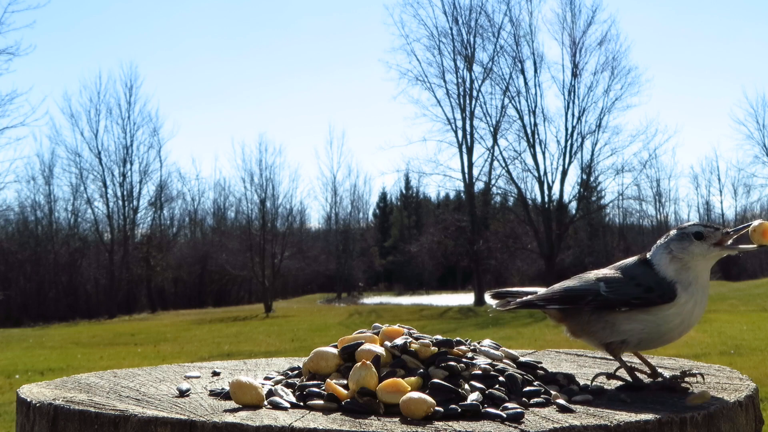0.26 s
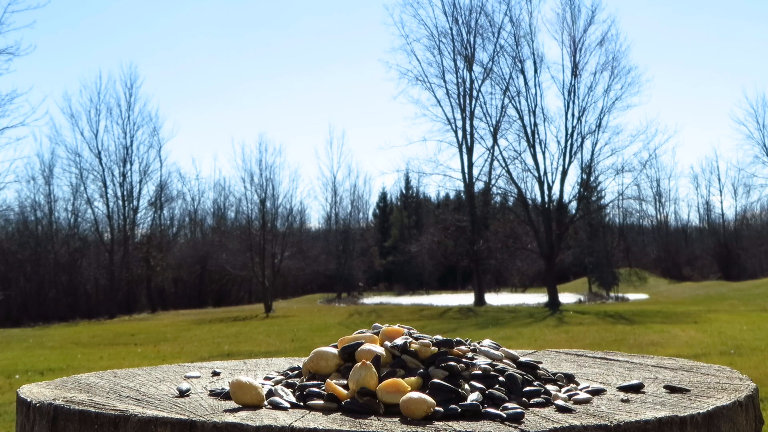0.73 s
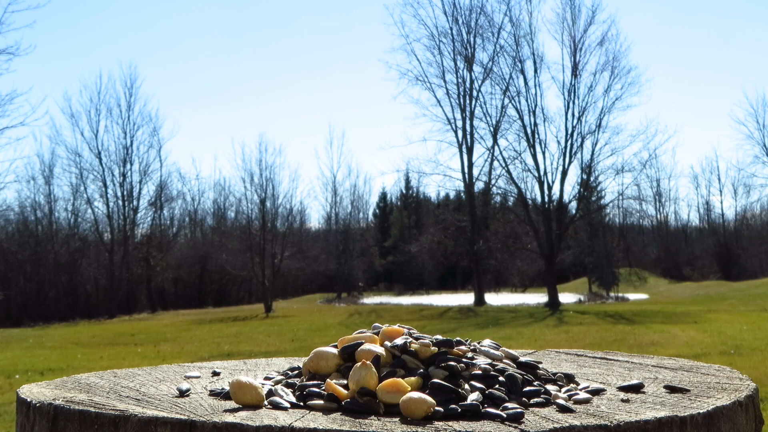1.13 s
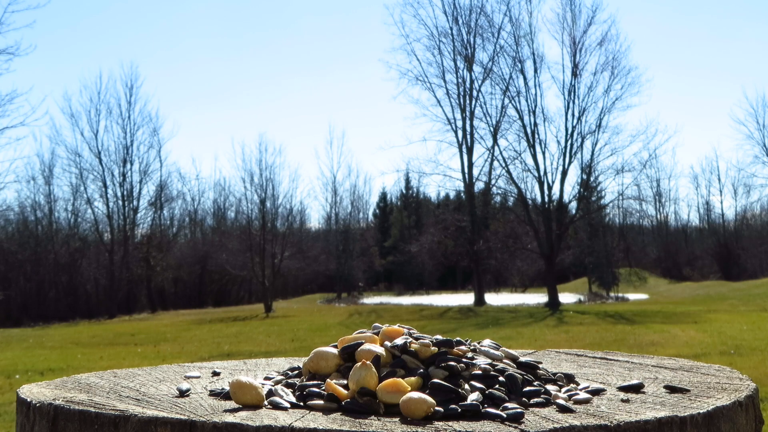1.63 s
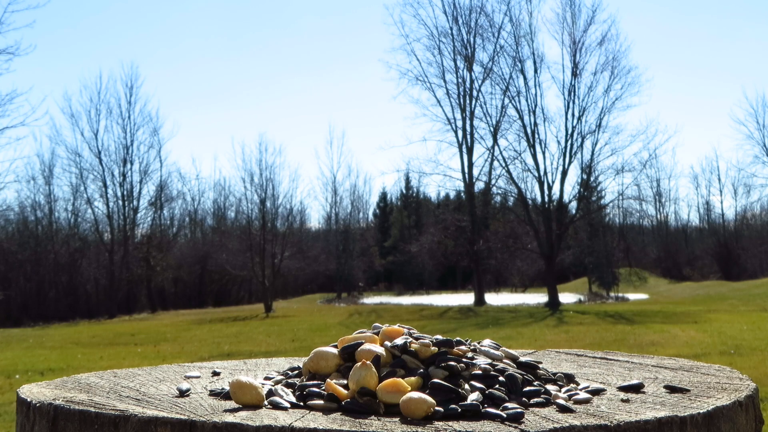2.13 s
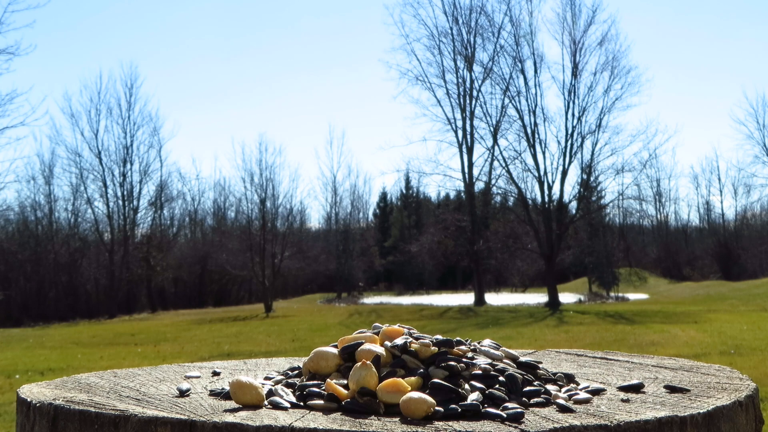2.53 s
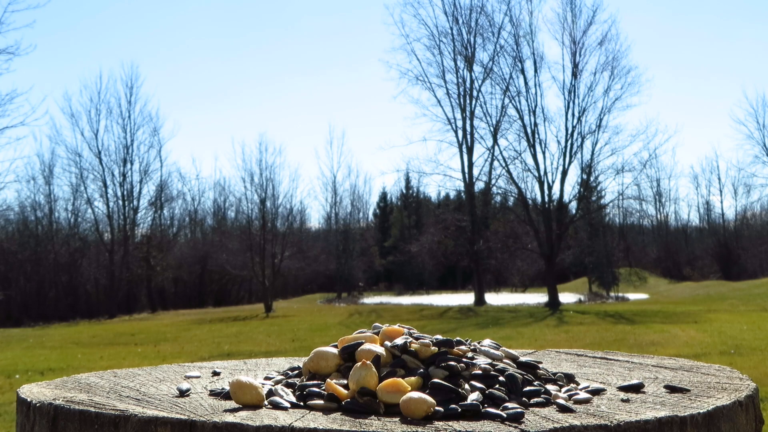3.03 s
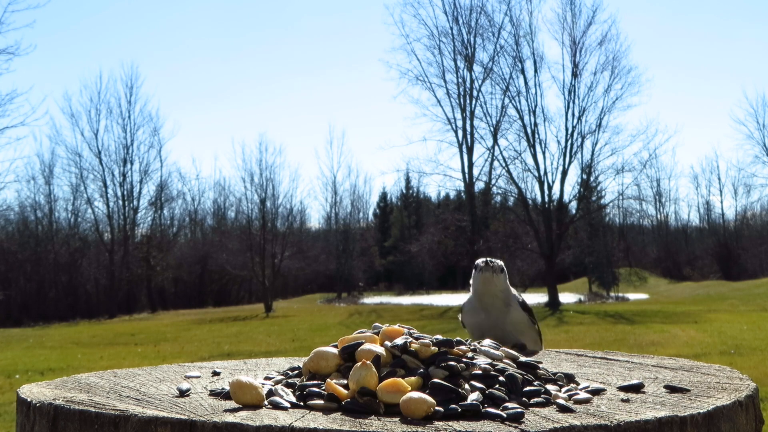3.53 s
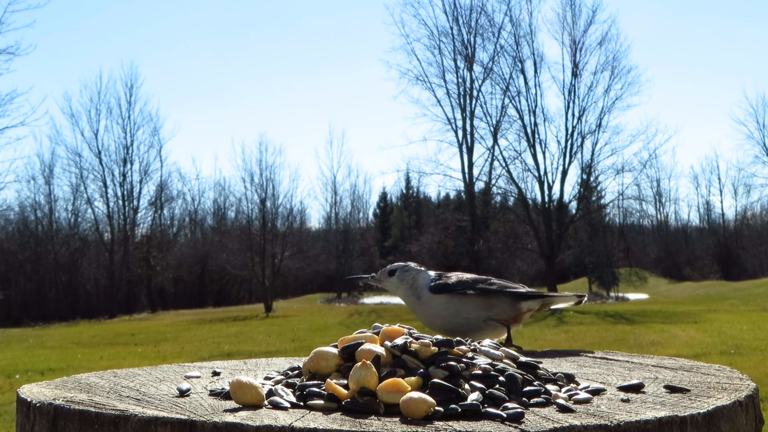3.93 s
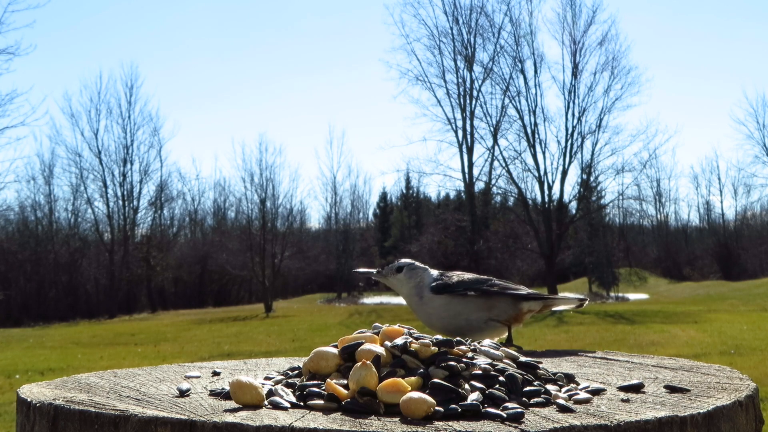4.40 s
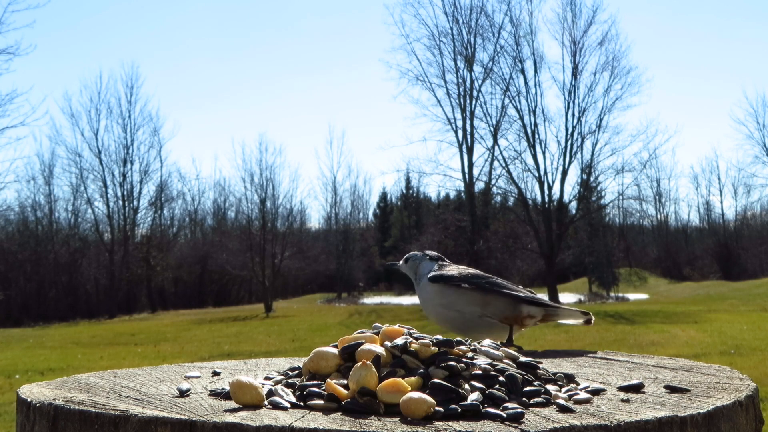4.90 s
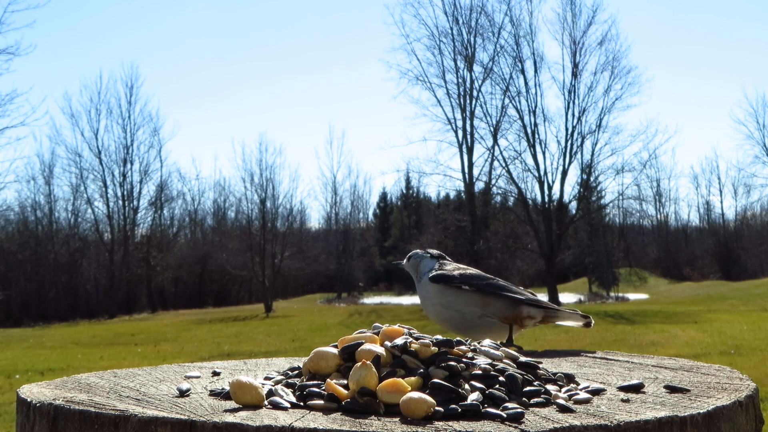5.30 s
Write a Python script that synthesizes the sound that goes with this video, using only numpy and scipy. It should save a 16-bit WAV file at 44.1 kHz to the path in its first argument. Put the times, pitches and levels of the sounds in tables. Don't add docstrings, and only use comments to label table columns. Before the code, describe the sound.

A quiet open field heard by a close stereo microphone: low distant traffic, light breeze, a fading engine drone and a barely audible high electronic whine run throughout. From 0.1 to 0.4 s, tiny dry ticks of claws and husks lean left on the wood. At about 0.6 s, amid low wind buffets, a sharp woody knock marks a push-off; from 0.75 to 0.95 s rapid feathery wingbeats, with claps and puffs, swing right and vanish. A faint nasal call comes at 1.1 s, a fainter one at 1.7 s, another brief one at 3.1 s. Soft wingbeats at 3.4-3.6 s bring a bird in to land, with a small engine rev far off and a tiny call. At 3.9 s a loud, very short nasal call, about 40 milliseconds, rings close with faint echo. A second, somewhat softer, follows at 5.3 s, with a low wind buffet near the end.

```python
import sys
import numpy as np
from scipy import signal
from scipy.fft import rfft, irfft, next_fast_len
from scipy.io import wavfile
from scipy.ndimage import uniform_filter1d

SR = 44100
rng = np.random.default_rng(int(sys.argv[2]) if len(sys.argv) > 2 else 0)


def master_out(mix):
    frames = np.transpose(np.atleast_2d(mix))
    ceiling = np.clip(frames, -1, 1)
    pcm = np.round(ceiling * 32767).astype(np.int16)
    wavfile.write(sys.argv[1], SR, pcm)


def voltage_ratio(level):
    return 10 ** (np.asarray(level, float) / 20)


N = 245195
TIME = np.arange(N) / SR

# start_s, swell_s, hold_s, fade_db_per_s, level_db
FLIGHTS = [
    (.735, .012, .12, 90, -55),
    (3.33, .13, .17, 150, -62.5),
]


def colour(x, points):
    hz, db = np.transpose(points)
    size = next_fast_len(x.shape[-1])
    f = np.maximum(np.arange(size // 2 + 1) * SR / size, 1)
    gain = voltage_ratio(np.interp(np.log(f), np.log(hz), db))
    return irfft(rfft(x, size) * gain, size)[..., :x.shape[-1]]


def unit(x):
    return x / np.sqrt(np.mean(x ** 2))


def ring(x, hz, t60):
    pole = np.exp(2j * np.pi * hz / SR - np.log(1000) / (t60 * SR))
    return signal.lfilter([1], [1, -pole], x).imag


def add(out, x, s, pan_db):
    i = int(s * SR)
    x = x[..., :N - i]
    out[:, i:i + x.shape[-1]] += x * voltage_ratio(np.array([[pan_db], [-pan_db]]) / 2)


def walk(rate):
    k = int(SR / rate)
    held = np.repeat(rng.standard_normal(N // k + 1), k)
    slewed = uniform_filter1d(uniform_filter1d(held, k), k)
    return unit(slewed[:N])


def bump(s, half):
    return np.exp(-((TIME - s) / half) ** 2)


def land():
    # frequency_hz, density_db_per_hz
    spectrum = [(22, -14), (49, -3), (130, -0.5), (250, -6.5), (320, -13), (600, -10), (1330, -8.5),
                (1550, -15), (4000, -21), (8000, -28.5), (11500, -39.5), (12600, -53.5), (13800, -43),
                (14500, -62)]
    # frequency_hz, side_minus_mid_db
    width = [(60, -8), (110, -9), (200, 2), (380, 7), (700, -0.5), (1290, -5), (2380, -5.5), (4400, -6.5),
             (8120, -4), (15000, -0.5)]
    # time_s, level_db
    breeze_points = [(0.0, -54.5), (0.36, -55), (0.71, -55), (1.02, -51), (1.33, -56.5), (2.32, -55),
                     (2.49, -57.5), (2.74, -58.5), (3.13, -53.5), (4.3, -54), (4.65, -55.5), (5.26, -56.5),
                     (5.56, -55)]
    follow = [
        (0.66, 0.38),
        (0.082, 1),
        (0.42, 0.53),
    ]
    breeze = np.interp(TIME, *np.transpose(breeze_points))
    traffic = -0.36 * TIME - 2.5 * bump(2.56, 0.23)
    swell = [a * (breeze - breeze.mean()) + b * (traffic - traffic.mean()) for a, b in follow]
    noise = colour(rng.standard_normal((2, N)), spectrum)
    noise[1] = colour(noise[1], width)
    out = 0
    for hz in 20 * 2 ** np.arange(0, 10, .5):
        db = swell[int(hz > 420) + int(hz > 1500)]
        flicker_db = np.interp(np.log2(hz), [6, 10, 13], [1.5, .9, .5]) * walk(9)
        edges = [(hz / 2, -90), (hz / 2 ** .5, -40), (hz / 2 ** .25, -3), (hz, 0),
                 (hz * 2 ** .25, -3), (hz * 2 ** .5, -40), (hz * 2, -90)]
        out = out + voltage_ratio(db + flicker_db) * colour(noise, edges)
    mid, side = voltage_ratio(-49.5) * out / np.sqrt(np.mean(out[0] ** 2))
    return np.array([mid + side, mid - side])


def engine():
    # frequency_hz, bandwidth_hz, level_db
    tones = [(234.5, 16, -2), (308, 59, 0.4)]
    drone = sum(voltage_ratio(db) * unit(ring(rng.standard_normal(N), hz, 1.8 / width)) for hz, width, db in tones)
    idle_db = np.maximum(-53 - 6.5 * TIME, -64)
    rev_db = 7.5 * bump(3.7, 0.18)
    return drone * voltage_ratio(idle_db + rev_db)


def electronics():
    whine = voltage_ratio(-93) * np.sin(2 * np.pi * 15715 * TIME + walk(60))
    skirt = [(14600, -60), (15200, -10), (15600, -6), (15750, 0), (15830, -40)]
    return whine + voltage_ratio(-92) * unit(colour(rng.standard_normal(N), skirt))


def claws():
    # start_s, peak_db, centre_hz, t60_s, left_minus_right_db
    ticks = [(.103, -74, 8000, .006, 1), (.170, -51, 8100, 0.0083, 6), (.174, -59, 9000, 0.0089, 19),
             (.180, -58, 8000, .008, 1), (.219, -57, 9000, .006, 1), (.272, -52, 6500, .006, 1),
             (0.284, -49.5, 7960, .006, 4), (.290, -63, 8000, .006, 1), (.318, -64, 10000, .006, 1),
             (0.375, -47, 7000, .012, 6)]
    out, t = np.zeros((2, N)), np.arange(SR // 20) / SR
    for s, db, hz, t60, pan_db in ticks:
        scrape = rng.standard_normal(len(t)) * voltage_ratio(-60 * t / t60)
        band = [(hz / 4, -24), (hz / 2, -3), (hz, 0), (hz * 1.45, -5), (hz * 3.5, -34)]
        add(out, voltage_ratio(db + 9) * colour(scrape, band), s, pan_db)
    return out


def wind():
    # centre_s, level_db
    gusts = [(0.505, -56), (.63, -63), (.88, -55), (2.803, -69), (3.988, -61), (5.41, -48.5)]
    low = [(25, -17), (55, 10), (100, 5), (150, -10.0), (250, -42), (1000, -120)]
    rumble = unit(colour(rng.standard_normal(N), low))
    return rumble * sum(voltage_ratio(db) * bump(s, 0.077) for s, db in gusts)


def push_off():
    # start_s, peak_db, left_minus_right_db
    knocks = [(0.5906, -14.5, 1)]
    # frequency_hz, level_db, t60_s
    modes = [(310, 1.5, 0.21), (690, -2, 0.022), (1350, -12, .015), (1860, -12, .015), (2380, -15, 0.048),
             (2700, -20, 0.069), (3240, -9, 0.03), (3480, 2, 0.007), (3920, 0.5, 0.0071),
             (4600, -3, 0.0093), (4800, 3, 0.0046), (5460, -10, 0.0069), (6500, -12, .006),
             (8020, 0, 0.0045), (11000, -30, .004)]
    out, t = np.zeros((2, N)), np.arange(SR // 20) / SR
    for s, db, pan_db in knocks:
        contact = np.sin(2 * np.pi * np.clip(t / .0002, 0, 1))
        knock = sum(voltage_ratio(g) * ring(contact, hz, t60) for hz, g, t60 in modes)
        add(out, voltage_ratio(db) * knock / np.abs(knock).max(), s, pan_db)
    return out


def feathers(size):
    # frequency_hz, density_db_per_hz
    spectrum = [(600, -10), (1500, -0.5), (3500, 0), (6000, -5.5), (9000, -5.5), (11500, -14), (13500, -21),
                (15000, -50)]
    # frequency_hz, left_minus_right_db
    lean = [(300, -12), (3000, -1), (5000, -1), (8000, 8.5)]
    grain = voltage_ratio(1.0 * rng.standard_normal(size))
    mid, side = unit(colour(rng.standard_normal((2, size)) * grain, spectrum))
    hz, db = np.transpose(lean)
    left, right = mid + voltage_ratio(-4) * side * np.array([[1], [-1]])
    return np.array([colour(left, np.c_[hz, db / 2]), colour(right, np.c_[hz, -db / 2])])


def rustle_db():
    faint_db = -80
    levels = []
    for s, swell, hold, fade, db in FLIGHTS:
        rising = (TIME - s - swell) / swell * (db - faint_db)
        falling = (s + swell + hold - TIME) * fade
        levels.append(db + np.clip(np.minimum(rising, falling), faint_db - db, 0))
    return np.max(levels, axis=0)


def wings():
    # time_s, swish_db, thump_db, clap_hz, clap_db
    beats = [(0.748, -42, -50, 1560, -38.5), (0.779, -50, -62, 8000, -52), (.796, -39, -39, 770, -35.5),
             (.830, -48, -60, 6000, -47), (.845, -40, -37, 4100, -39), (.856, -56, -48, 3120, -40),
             (.897, -47.5, -42, 2250, -49), (.950, -52.5, -46, 1300, -44), (3.402, -66, -63, 6200, -60),
             (3.463, -60, -49, 8000, -64), (3.506, -59, -50, 7500, -62), (3.580, -60, -67, 8000, -69),
             (3.591, -60, -58, 3500, -56), (3.638, -65, -57, 8000, -71)]
    air = [(40, -2), (120, -9), (320, 15), (800, -10), (1500, -40), (4000, -100)]
    t = np.arange(SR // 12) / SR
    out = feathers(N) * voltage_ratio(rustle_db() + 4.9 * walk(70))
    lead = .006
    rise, fall = np.clip(t - lead, None, 0), np.clip(t - lead, 0, None)
    for s, swish_db, thump_db, clap_hz, clap_db in beats:
        leaving = s < FLIGHTS[1][0]
        pan_db = leaving * max(1 - 42 * (s - beats[0][0]), -4)
        noise = rng.standard_normal((2, len(t)))
        decay = np.exp(-fall / .004) + .42 * np.exp(-fall / .013)
        swish = voltage_ratio(swish_db) * feathers(len(t)) * np.exp(rise / .002) * decay
        clap = voltage_ratio(clap_db) * unit(ring(noise[0], clap_hz, 0.021)) * np.exp(rise / 0.0021 - fall / 0.0033)
        puff = unit(colour(noise[1], air))
        puff = puff - 2.0 * np.exp(-((t - lead) / 0.00056) ** 2)
        thump = voltage_ratio(thump_db) * puff * np.exp(rise / 0.003 - fall / 0.0038)
        add(out, swish + clap + thump, s - lead, pan_db)
    return out


def breath(start, length, db, crest, pointed, top_hz, top, sag):
    t = np.arange(start - .002, start + length + .002, 1 / SR)
    u = np.clip((t - start) / length, 0, 1)
    swell = np.sin(np.pi / 2 * np.minimum(u / crest, (1 - u) / (1 - crest))) ** pointed
    pitch = top_hz * (1 - sag * ((u - top) * length / .02) ** 2)
    return t, u, pitch, voltage_ratio(db) * swell


def call(sung, arch, throat, pan):
    pan_db, tilt_db, lead_ms, shimmer_db = pan
    t, u, pitch, pressure = breath(*sung, *arch)
    effort = uniform_filter1d(pressure, size=60)
    k = np.arange(1, 14)[:, None]
    harmonic_hz = k * pitch
    upper = np.maximum(k - 4, 0)
    dull_db = upper * (.13 * 20 * np.log10(effort / effort.max() + .03) - 3.0 * u)
    throat_hz, throat_db = np.transpose(throat)
    gain = voltage_ratio(np.interp(np.log(harmonic_hz), np.log(throat_hz), throat_db) + dull_db)
    gain *= voltage_ratio(-90 * np.maximum(np.log2(harmonic_hz / throat_hz[-1]), 0))
    drift = rng.standard_normal((len(k), 8))
    knots = np.linspace(t[0], t[-1], 8)
    gain *= voltage_ratio(shimmer_db * np.array([np.interp(t, knots, row) for row in drift]))
    phase = k * 2 * np.pi * np.cumsum(pitch) / SR
    phase = phase + .04 * k ** 2
    phase = phase + .6 * (shimmer_db - .5) * drift[:, :1]
    lead = np.pi * harmonic_hz * lead_ms / 1000
    lean = voltage_ratio((pan_db + tilt_db * np.log2(harmonic_hz / 2000)) / 2)
    left = (-gain * lean * np.cos(phase + lead)).sum(axis=0)
    right = (-gain / lean * np.cos(phase - lead)).sum(axis=0)
    return t[0], effort * np.array([left, right])


def field(voice):
    # delay_s, level_db, left_minus_right_db
    slaps = [(0.029, -25, -7), (0.037, -28, -1), (.047, -31, 2)]
    t = np.arange(SR // 4) / SR
    t60 = .34
    paths = rng.standard_normal((2, len(t))) * voltage_ratio(-60 * t / t60) * np.clip(t / .035, 0, 1) ** 2
    paths *= voltage_ratio(-24) / np.sqrt(np.sum(paths ** 2) / 2)
    for lag, db, pan_db in slaps:
        paths[:, int(lag * SR)] += voltage_ratio(db + np.array([pan_db, -pan_db]) / 2)
    paths = signal.sosfilt(signal.butter(1, 3500, fs=SR, output="sos"), paths)
    return signal.fftconvolve(voice.mean(axis=0)[None], paths, axes=1)[:, :N]


def bird():
    # start_s, length_s, level_db, crest_share_of_length, pointedness (0 flat, 1 round)
    sung_calls = [
        (1.140, .054, -42.5, .57, 2.2),
        (3.078, .0335, -37.5, .47, .8),
        (3.9287, .0403, -18.1, .47, .7),
        (1.731, .042, -50, .45, .6),
        (3.625, .021, -47, .52, 2.0),
        (5.310, .043, -24.6, .42, 1.1),
    ]
    # top_pitch_hz, top_share_of_length, sag_share_of_pitch 20 ms from the top
    arches = [(861, 0.63, 0.0306), (983, 0.27, 0.075), (940.7, 0.41, 0.13), (870, 0.22, .03),
              (521, .0, .03), (921, 0.27, 0.096)]
    # frequency_hz, level_db
    throats = [
        [(860, -22), (1720, 0), (2580, -2), (3440, -12), (4300, -13), (5160, -11), (6900, -19), (8000, -22)],
        [(975, -14), (1900, -1), (3760, 0), (3920, -12), (4620, -14), (4880, -1), (5850, -28), (9800, -19)],
        [(930, -22), (1800, 0), (3750, -6), (4300, -21), (4680, -14), (5600, -28), (7500, -38), (11200, -16)],
        [(880, -14), (1760, 0), (2640, -7), (3500, -8), (4400, -7), (5300, -20), (7000, -30), (9000, -45)],
        [(1000, -10), (1550, 0), (2050, -2), (2560, -8), (3070, 0), (3600, -10), (4600, -6), (5500, -20)],
        [(915, -28), (1750, 0), (2750, -4), (3680, 0), (4300, -26), (4600, -19), (5500, -22), (8200, -38)],
    ]
    # left_minus_right_db at 2 kHz, tilt_db_per_octave, left_lead_ms, shimmer_db
    pans = [(-6, 1, -.02, 3), (-3.5, 3, -.015, 1.8), (-.5, 2, .028, .5), (-2, 2, 0, 3), (0, 1, 0, 1),
            (-.5, 2, .028, .5)]
    # first_delay_s, level_db
    near_echoes = [(.014, -8), (.011, -12.5), (.009, -34), (0.017, -11), (0.014, -28), (.009, -27)]
    out = np.zeros((2, N))
    for sung, arch, throat, pan, (first, near_db) in zip(sung_calls, arches, throats, pans, near_echoes):
        s, voice = call(sung, arch, throat, pan)
        add(out, voice, s, 0)
        add(out, voltage_ratio(near_db) * voice[::-1], s + first, 0)
        add(out, voltage_ratio(near_db) * voice, s + 1.9 * first, 0)
    return out + field(out)


def scene():
    port = [(11500, 0), (14000, -5), (15200, -28)]
    near = colour(claws() + push_off() + wings(), port)
    return land() + engine() + wind() + near + bird()


def band_limit(x):
    return signal.sosfilt(signal.butter(12, 15830, fs=SR, output="sos"), x)


def record(dry):
    mix = dry + electronics()
    return band_limit(mix)


dry = scene()
out = record(dry)
master_out(out)
```